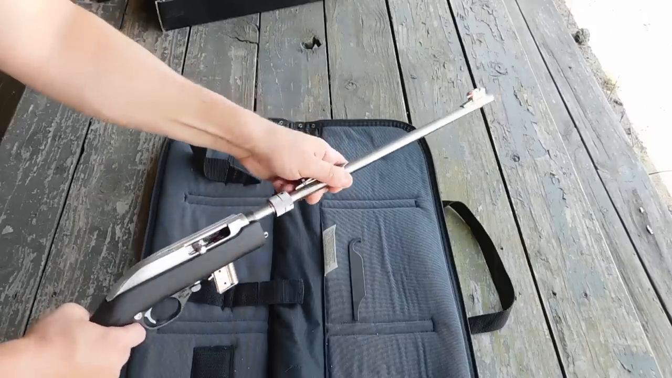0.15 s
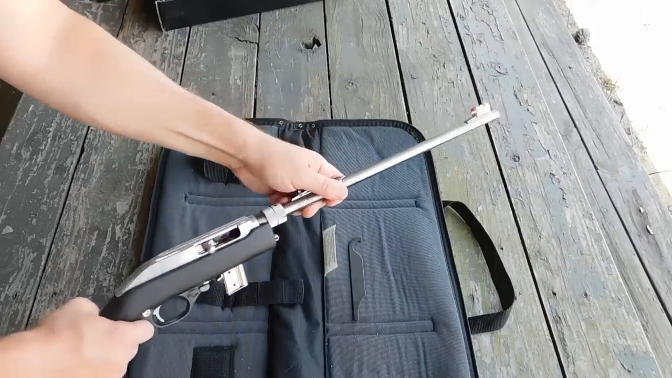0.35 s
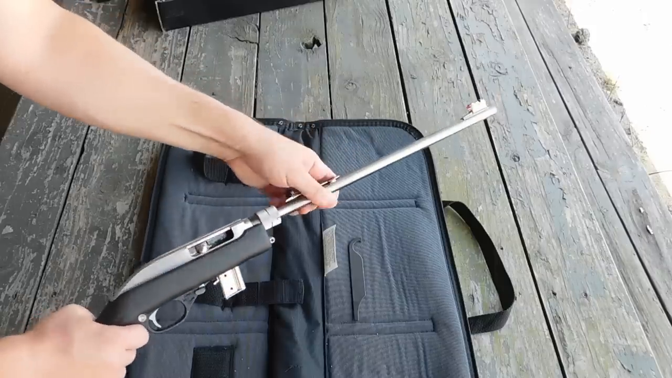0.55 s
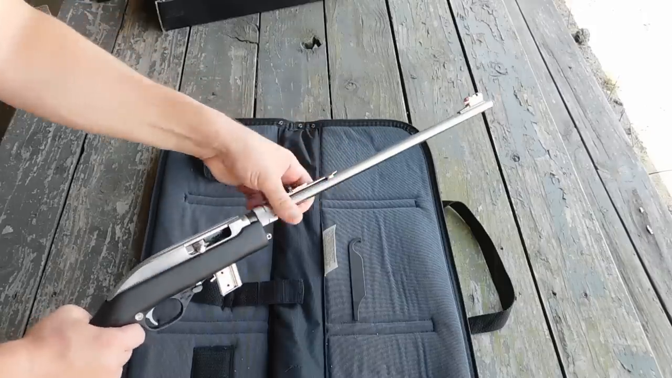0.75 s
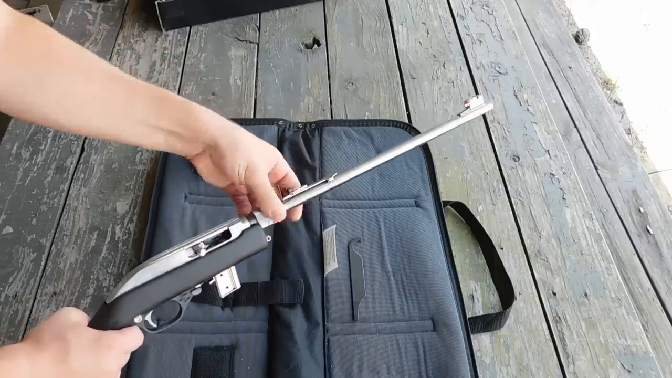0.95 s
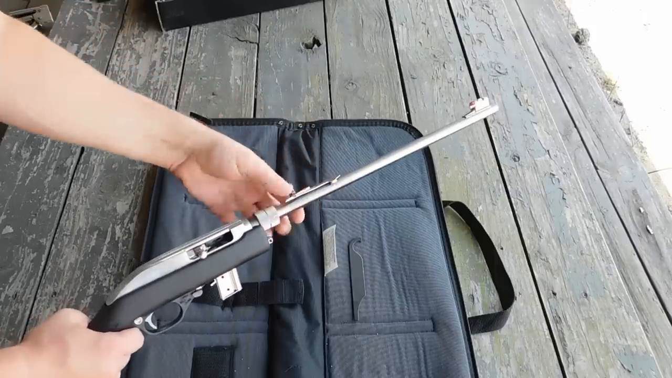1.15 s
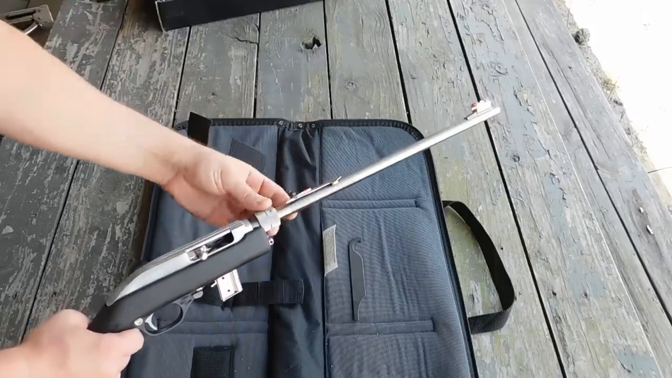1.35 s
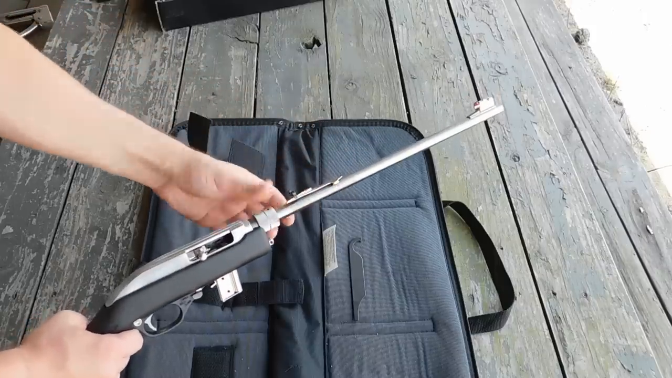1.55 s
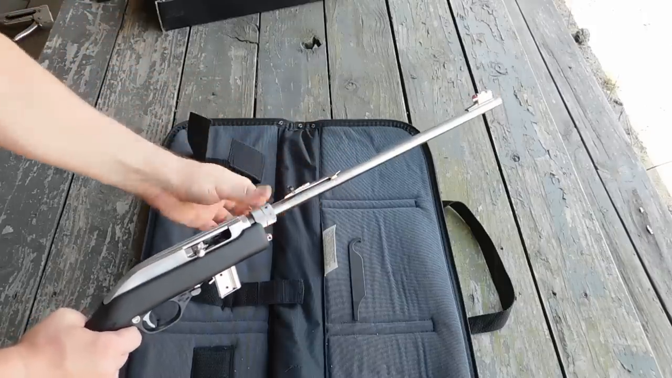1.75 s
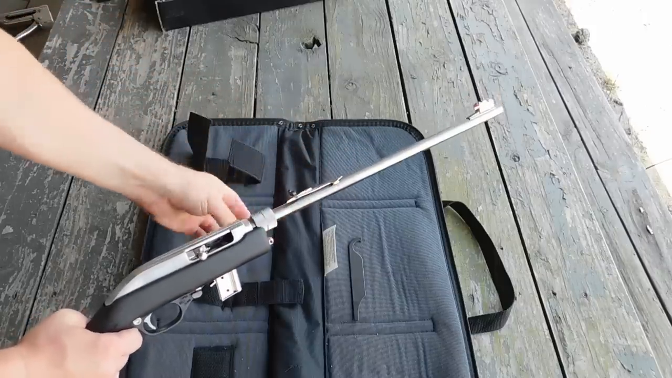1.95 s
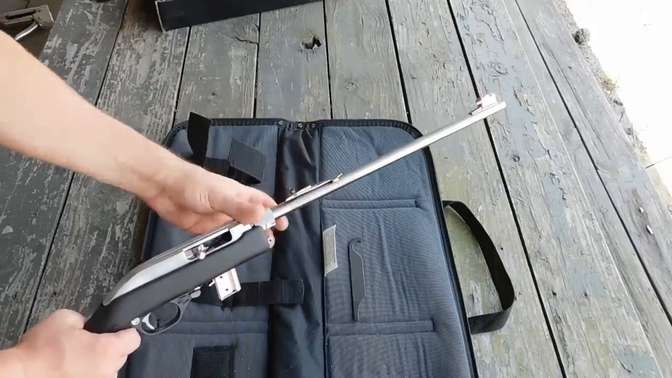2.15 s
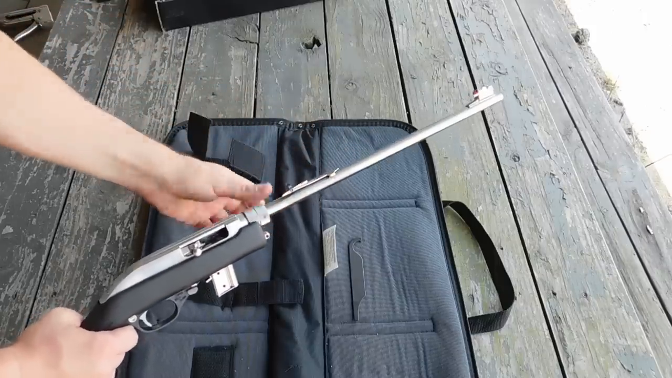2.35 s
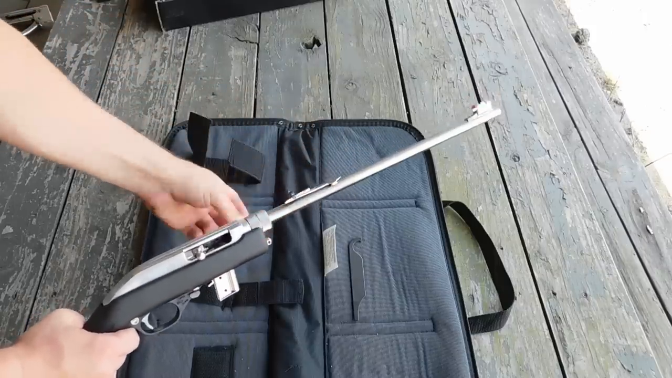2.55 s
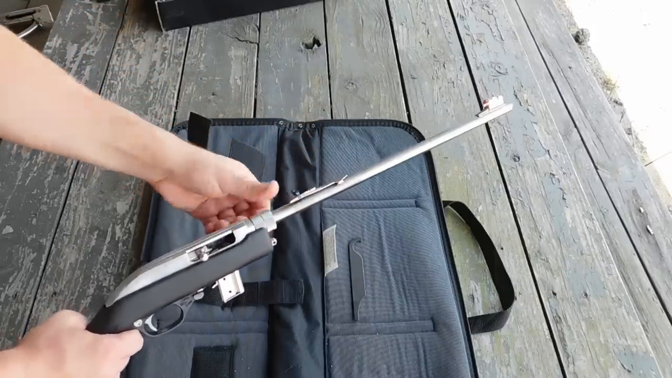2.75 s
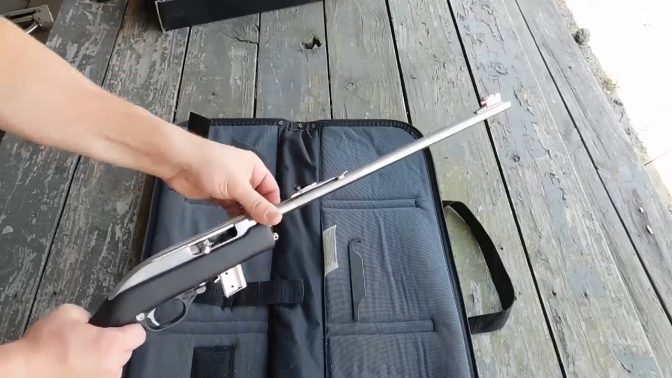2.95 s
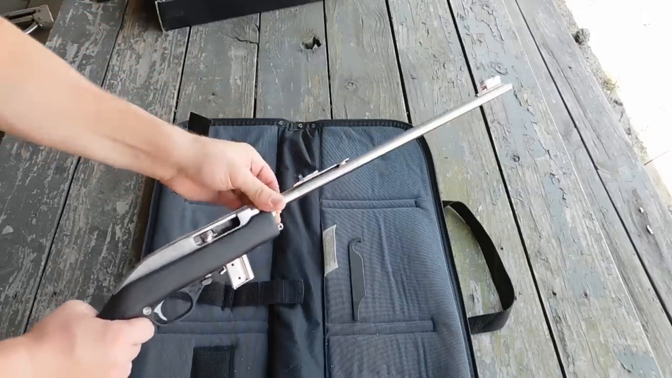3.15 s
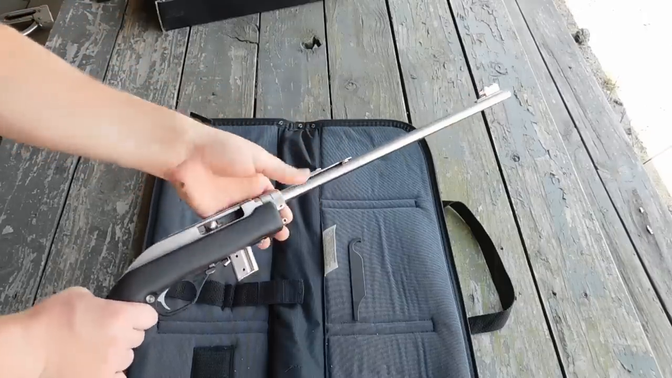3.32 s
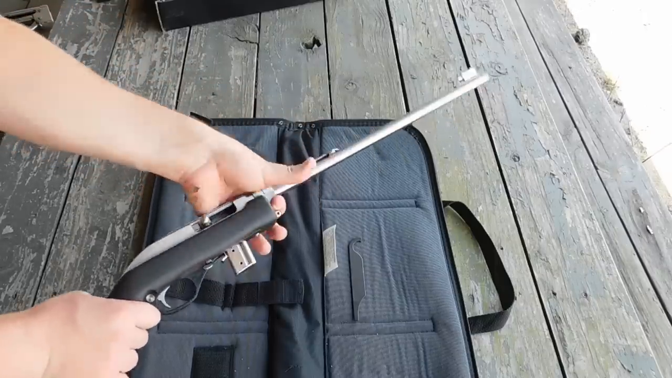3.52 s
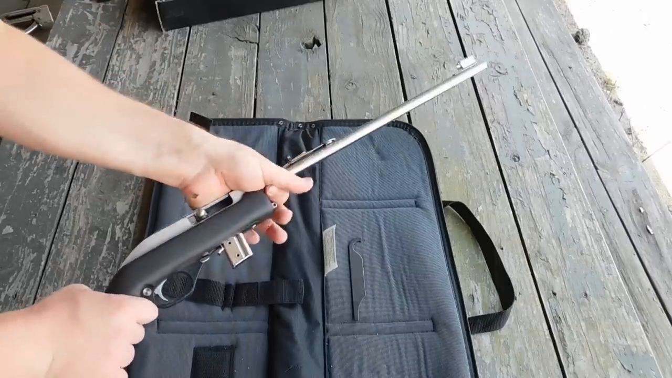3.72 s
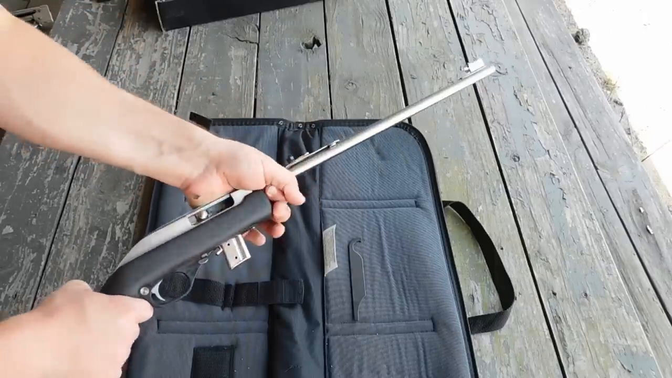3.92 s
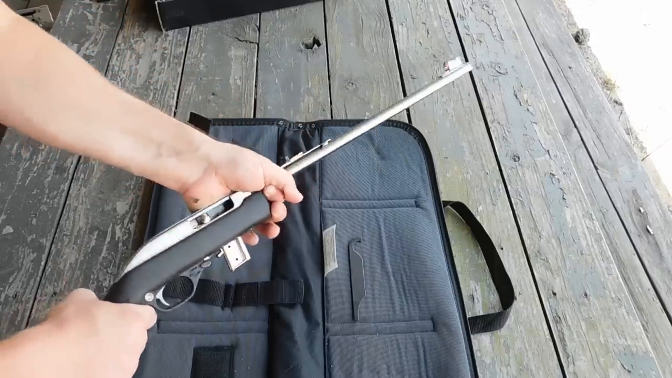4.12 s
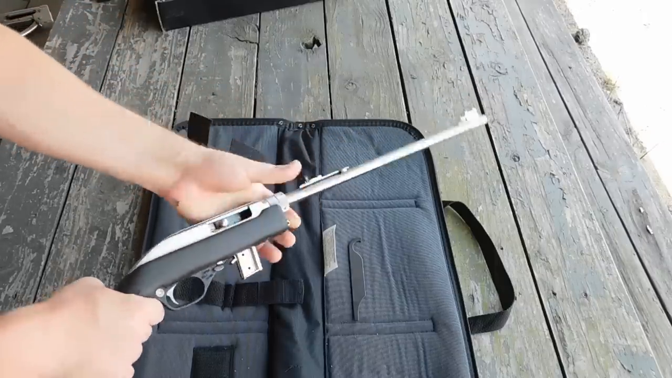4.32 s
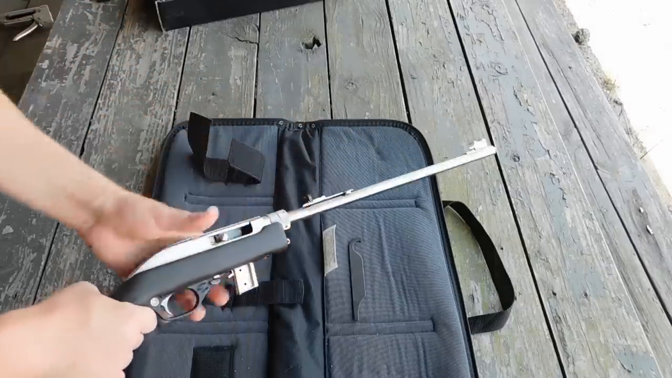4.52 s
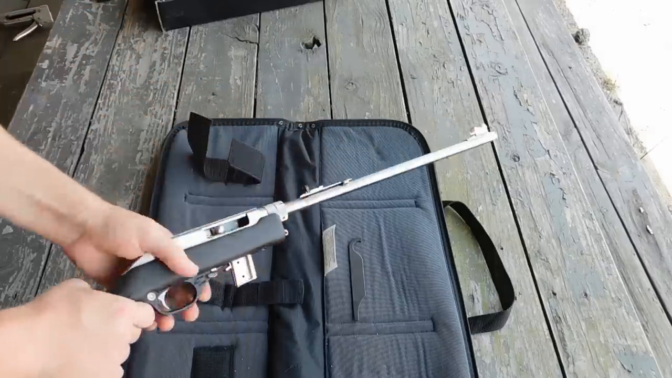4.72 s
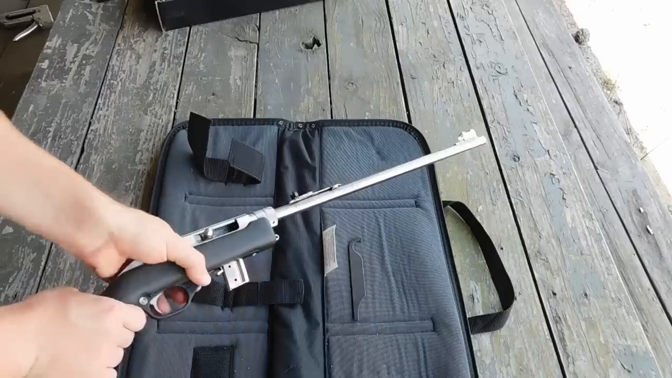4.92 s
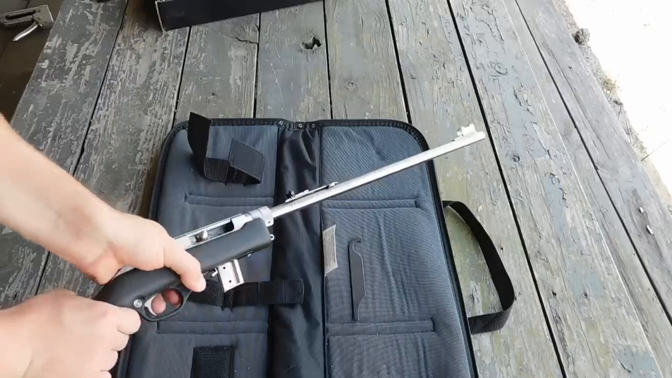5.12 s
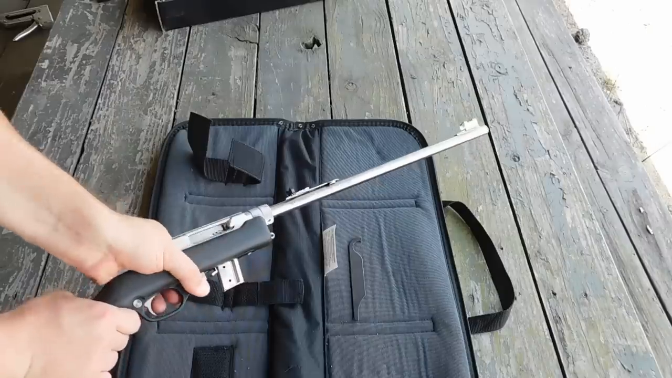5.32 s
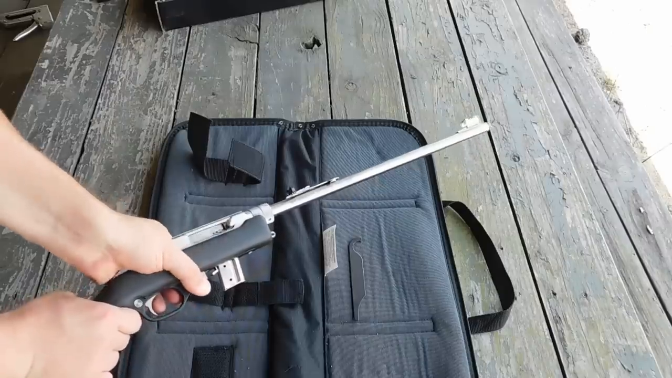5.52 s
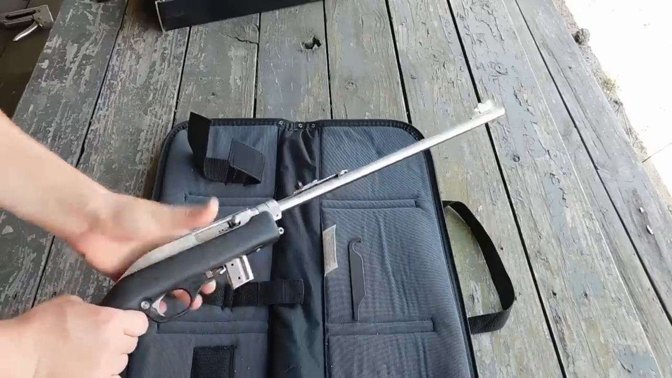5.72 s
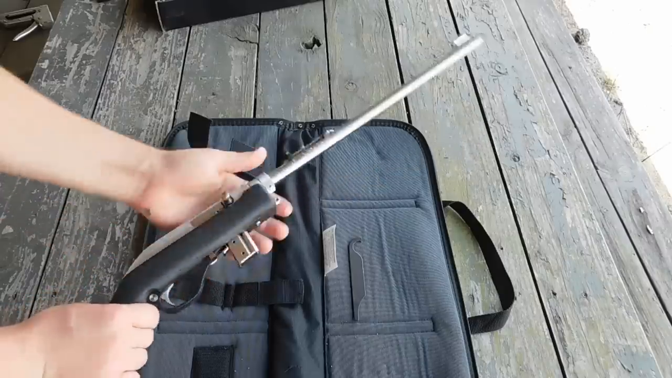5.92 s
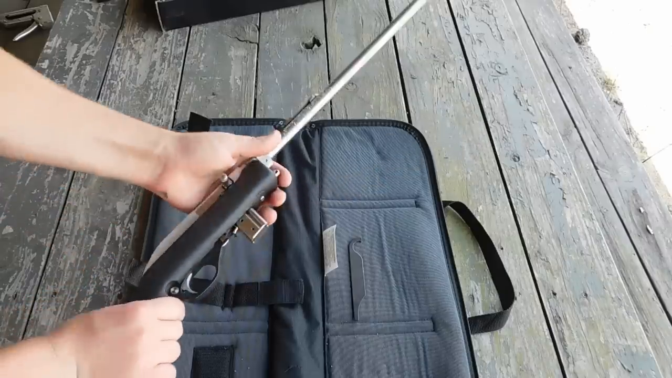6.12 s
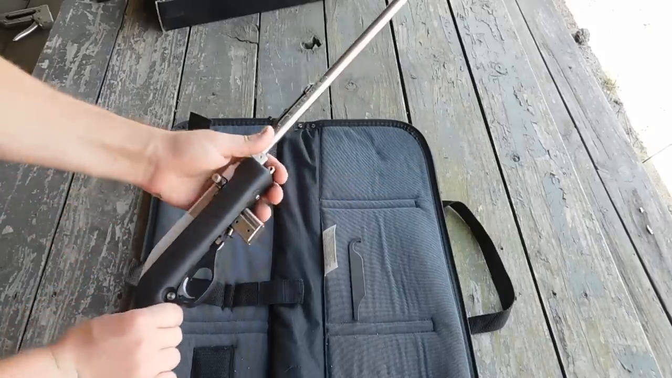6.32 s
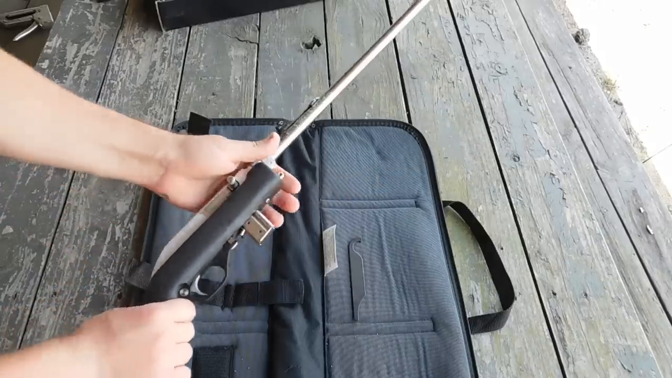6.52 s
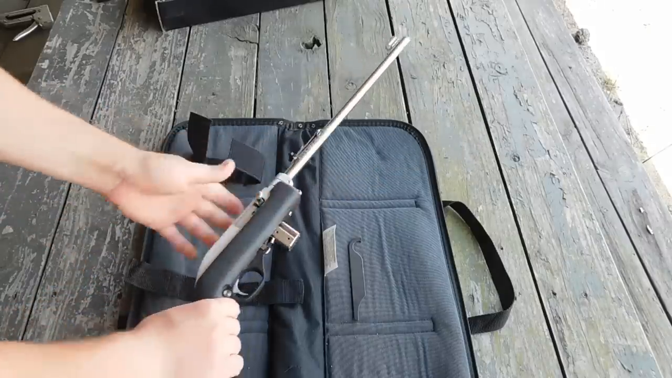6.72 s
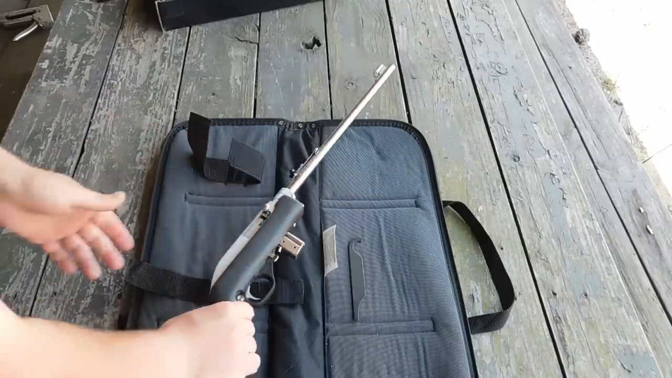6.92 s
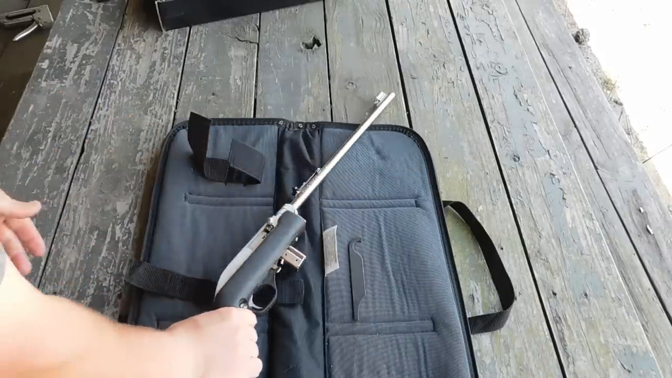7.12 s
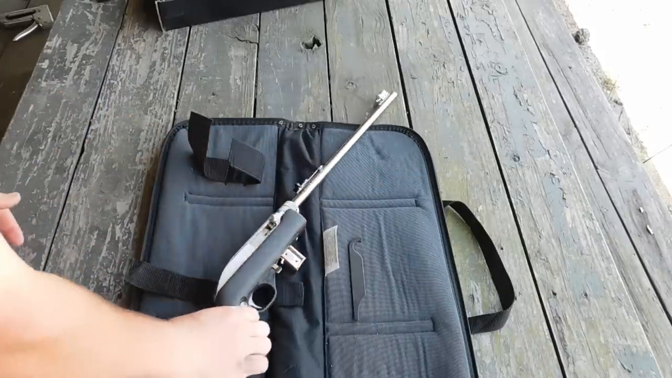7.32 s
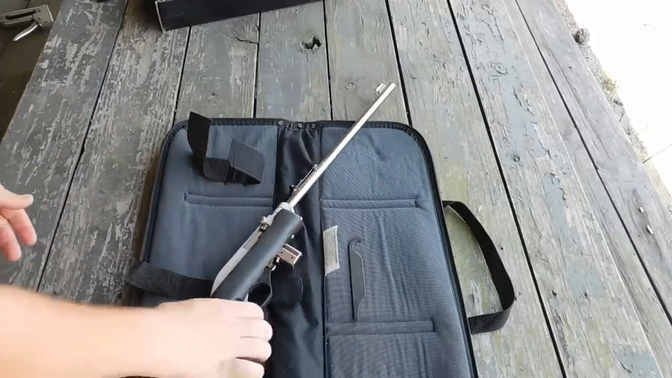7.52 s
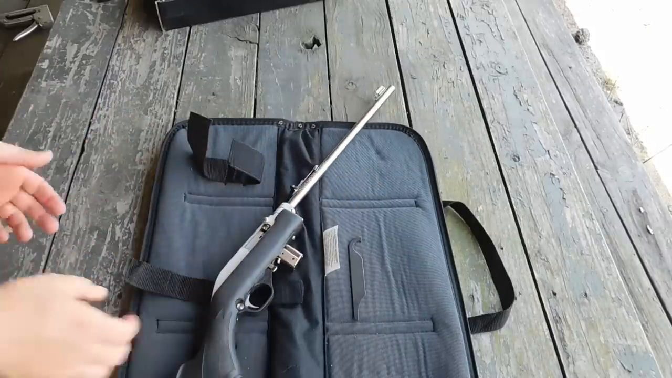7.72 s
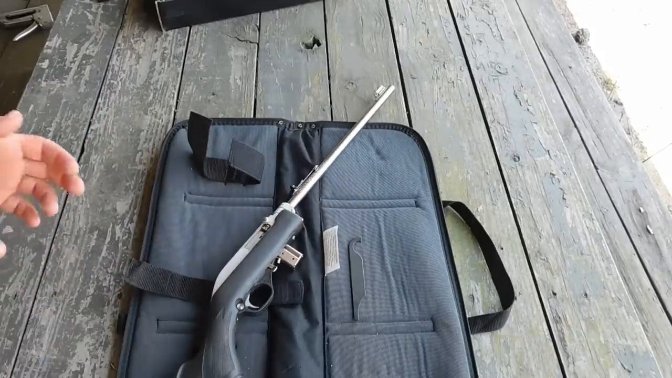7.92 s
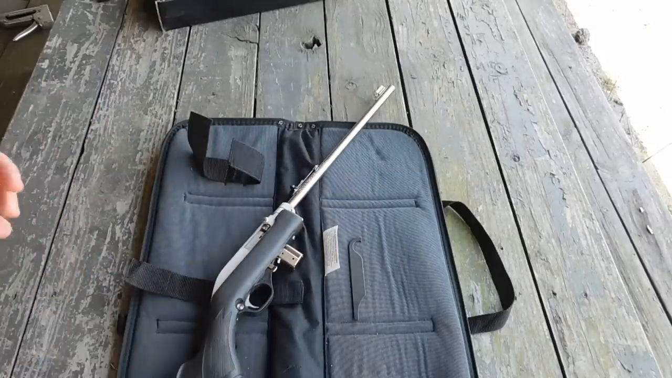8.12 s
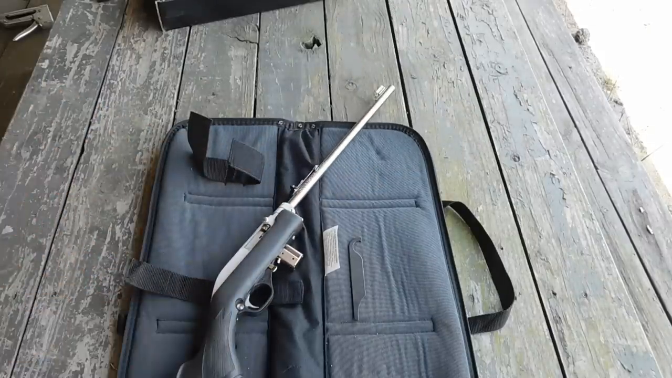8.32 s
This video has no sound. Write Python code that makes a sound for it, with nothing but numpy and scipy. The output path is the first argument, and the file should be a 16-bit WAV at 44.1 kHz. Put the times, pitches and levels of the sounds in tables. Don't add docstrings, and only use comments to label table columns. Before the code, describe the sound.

Steel barrel clacks hard into place, light ticks and nut turns follow, distant shots thud, a bolt slams, then the rifle settles on a padded case.

```python
import sys
import numpy as np
from scipy import signal
from scipy.fft import rfft, irfft
from scipy.io import wavfile

SR = 44100
rng = np.random.default_rng(int(sys.argv[2]) if len(sys.argv) > 2 else 0)


def digitize_waveform(pressure):
    field = np.atleast_2d(pressure).T
    bounded = np.clip(field, -1, 1)
    quanta = np.round(bounded * 32767).astype(np.int16)
    wavfile.write(sys.argv[1], SR, quanta)


def invert_db(x):
    u = np.asarray(x, float) / 20
    return 10 ** u


N = 368676

# [f/Hz, level/dB, t60/s]
BARREL_MODES = [(720, -0.5, 0.021), (1080, -12.5, 0.0065), (1332, -6, 0.0068), (1700, 1, 0.014),
                (2080, -1.5, 0.06), (2290, 7.5, 0.0091), (2890, -1.5, 0.022), (3650, -7, 0.012),
                (4040, -3, 0.018), (4760, -11.5, 0.011), (5430, -8.5, 0.012), (3900, -7, 0.016),
                (7500, -12.5, 0.0085), (7800, -7.5, 0.027), (9600, 3, 0.0026), (10800, -11, 0.0056),
                (12500, -7, 0.0017), (14600, -4.5, 0.0083)]
# [t/s, left-right level/dB]
HAND_PLACES = [
    (0, 1),
    (1.2, 4.5),
    (2.6, 3.5),
    (3.3, 5.5),
    (5.2, 2.5),
    (5.37, 5.5),
    (6, 1.5),
    (7.3, 4.5),
    (8.36, 11),
]


def rms_one(x):
    return x / np.sqrt(np.mean(x ** 2) + 1e-20)


def in_time(rows, off=None):
    s, *columns = np.transpose(rows)
    return [np.interp(np.arange(N) / SR, s, c, off, off) for c in columns]


def at_hz(points, hz):
    points_hz, values = np.transpose(points)
    return np.interp(np.log(hz), np.log(points_hz), values)


def drift(rate):
    hop = 40
    r = np.exp(-2 * np.pi * rate * hop / SR)
    white = rng.standard_normal(N // hop + 2002)
    slow = signal.lfilter([1], [1, -2 * r, r * r], white)[2000:]
    return np.interp(np.arange(N) / hop, np.arange(len(slow)), rms_one(slow))


def coloured(x, spectrum, alike=None):
    # [f/Hz, left-right likeness]
    field_likeness = [(60, 1), (240, 0.11), (950, -0.019), (3770, 0.061), (15000, -1.3)]
    hz = np.maximum(np.fft.rfftfreq(x.shape[-1], 1 / SR), 1)
    mid, side = rfft(x) * invert_db(at_hz(spectrum, hz))
    alike = np.clip(at_hz(field_likeness, hz) if alike is None else alike, 0, 1)
    both = np.sqrt(1 + alike) * mid + np.sqrt(1 - alike) * side * [[1], [-1]]
    return rms_one(irfft(both, x.shape[-1]))


def add(out, sound, s, pan_db):
    i = round(s * SR)
    placed = invert_db([[pan_db / 2], [-pan_db / 2]]) * sound
    out[:, i:i + sound.shape[-1]] += placed[:, :N - i]


def swells(rows):
    swell_db = 20
    power, t = np.zeros(N), np.arange(N) / SR
    for s, peak_db, rise, fall in rows:
        rise, fall = 4 * max(rise, 1e-3), 4 * max(fall, 1e-3)
        i, j = max(int((s - rise) * SR), 0), int((s + fall) * SR)
        below = np.interp(t[i:j], [s - rise, s, s + fall], [1, 0, 1])
        power[i:j] += invert_db(2 * (peak_db - 4 * swell_db * below))
    return np.sqrt(power)


def grains(per_s, size_db):
    sizes = invert_db(size_db * np.minimum(rng.exponential(1, (2, N)), 5)) * rng.choice([-1, 1], (2, N))
    return sizes * (rng.random((2, N)) < per_s / SR)


def mode_bank(modes):
    hz, level_db, t60 = np.transpose(modes)[:, :, None]
    t = np.arange(24000 if t60.max() > .1 else 2500) / SR
    return invert_db(level_db - 60 * t / t60) * np.sin(2 * np.pi * hz * t)


def even(noise, fade):
    x = noise * fade
    for _ in range(12):
        tones = rfft(x)
        x = irfft(tones / (np.abs(tones) + 1e-12), x.shape[-1])
        top = 2 * fade * np.sqrt(np.sum(x ** 2, -1, keepdims=True) / np.sum(fade ** 2))
        x = np.clip(x, -top, top)
    return x


def struck(hits, modes, scatter_db, spread, dense_db, low_hz, top_hz=11000):
    mid_hz, high_hz = 2800, 6500
    out, bank, hz = np.zeros((2, N)), mode_bank(modes), np.array(modes)[:, 0]
    t = np.arange(bank.shape[1]) / SR
    group = (hz > mid_hz).astype(int) + (hz > high_hz)
    borders = [low_hz, mid_hz, high_hz, top_hz]
    bands = [signal.butter(2, borders[g:g + 2], "band", fs=SR, output="sos") for g in range(3)]
    dense = [rms_one(signal.sosfilt(band, np.arange(len(t)) == 0)) for band in bands]
    roofs = [signal.butter(2, 1.4 * border, fs=SR, output="sos") for border in borders[1:]]
    strengths = invert_db(scatter_db * rng.standard_normal((len(hits), len(modes))))
    rattles = rng.standard_normal((len(hits), 2, 1500))
    for hit, strength, pair in zip(hits, strengths, rattles):
        s, peak_db, mid_db, high_db, body_hz, contact_ms = hit
        contact = max(contact_ms, .1) * SR / 1000
        k = np.arange(pair.shape[1])
        fade = np.exp(-k / contact)
        fade = fade * (1 - np.exp(-k / (0.031 * contact)))
        mid, side = even(pair, fade)
        body = rms_one(invert_db(-60 * t / .014) * np.sin(2 * np.pi * body_hz * t))
        pan_db = np.interp(s, *np.transpose(HAND_PLACES))
        for g in np.unique(group):
            tone = rms_one(strength * (group == g) @ bank)
            tone = tone + invert_db(dense_db + .12 * peak_db) * dense[g]
            tone = signal.sosfilt(roofs[g], tone + invert_db(-0.5) * body * (g == 0))
            rattle = mid + spread * (1 + g) * side * [[1], [-1]]
            sound = signal.fftconvolve(rattle, tone[None], axes=1)
            level_db = peak_db + [0, mid_db, high_db][g]
            sound = sound / np.abs(sound.mean(0)).max() * invert_db(level_db)
            add(out, sound, s + .0005, pan_db - 0.4 * g)
    return out


def barrel():
    # [t/s, level/dB, brightness/dB, body f/Hz, contact/ms]
    knocks = [(0.123, -34.5, -13, 1720, 11), (0.26, -41, 8.5, 2080, 11), (0.2872, 5, -5, 1800, 1.15),
              (0.2945, -15, -0.5, 2070, 1.9), (0.313, -22, 7, 2170, 2.2), (0.659, -35.5, 0, 1080, 3.3),
              (1.053, -38, 2.5, 1470, 8.6), (1.0652, -33, -23, 2340, 2.9), (1.0857, -29, -3.5, 1590, 1.44),
              (1.146, -29, 0.5, 2280, 4.6), (1.3126, -23, 2.5, 2290, 3), (1.3208, -28, 2, 2270, 1.7),
              (1.3268, -27, 1.5, 2290, 2.5), (1.3769, -36.5, -25, 2100, 4.3),
              (1.4085, -44, -21.5, 1390, 5.4), (1.955, -33.5, -32, 1224, 7.8), (2.2736, -42, -1, 1530, 4),
              (2.5945, -24.5, -1, 1580, 1.1), (2.5984, -21.5, -8.5, 1350, 1.6),
              (3.2528, -47, -7.5, 1560, 5.6), (3.5673, -45, -7, 1516, 3.5), (5.2372, -47.5, 0, 1357, 4.7),
              (5.6583, -40.5, 0.5, 2600, 6), (6.014, -40, -3.5, 2483, 6.3)]
    # [t/s, level/dB, brightness/dB, body f/Hz]
    ticks = [(0.233, -42, -4.5, 2020), (0.6847, -37.5, -7, 1030), (0.8015, -45.5, -14.5, 1000),
             (0.8879, -46, -7.5, 1660), (0.9574, -40, -27, 2470), (0.99, -47, -10, 1430),
             (1.1332, -35, -19.5, 1520), (1.707, -51, -8, 1326), (1.7522, -44.5, -14.5, 1445),
             (1.9998, -48, -1, 1630), (2.3446, -48, -16.5, 1160), (2.5117, -46, -20, 1200),
             (2.54, -44, -30.5, 1495), (2.5553, -46, -17, 1610), (3.421, -49, -12, 2234),
             (3.625, -43, -20, 2270), (4.2672, -56.5, 3, 2010), (4.5898, -53, 1, 1690),
             (4.8023, -48, -16.5, 1190), (7.1233, -40, -7.5, 2450), (7.1506, -46, -12.5, 1944),
             (7.3038, -46, -11, 1300), (7.3472, -49, -2, 1500), (7.43, -42.5, -13, 1500),
             (7.45, -48, -10, 2200), (7.5892, -56, -8, 1880), (7.6102, -55.5, 6.5, 1685),
             (7.696, -57.5, 10, 1753)]
    follows = 0.72
    hits = []
    for s, db, bright, hz, ms in knocks:
        hardness_db = 0.2 * min(db, -20)
        hits.append((s, db, bright, -2.5 + follows * bright + hardness_db, hz, ms))
    for s, db, bright, hz in ticks:
        hits.append((s, db, bright, -8.5 + follows * bright, hz, 2.5))
    return struck(hits, BARREL_MODES, scatter_db=3.5, spread=0.18, dense_db=5.5, low_hz=1000)


def bolt():
    # [t/s, level/dB, mid level/dB, high level/dB, contact/ms]
    slams = [
        (5.369, -0.5, 9.5, 3.5, 1.53),
        (5.376, -11, 0, -4, 4),
        (5.384, -11, -1, -4, 2.5),
    ]
    # [f/Hz, level/dB, t60/s]
    bolt_modes = [(170, -30.5, 0.022), (950, -8, 0.011), (1500, 1, 0.016), (2010, 1, 0.014),
                  (2820, -5, 0.012), (3870, -1, 0.014), (3960, 0, 0.0089), (4600, -6, 0.016),
                  (4923, -12.5, 0.014), (5100, -8.5, 0.0065), (6560, 12, 0.0084), (7000, -1.5, 0.0044),
                  (7307, 2.5, 0.01), (8840, -3, 0.009), (10200, -13.5, .004), (11920, -16.5, 0.0022),
                  (13500, -14, 0.0034), (16000, -15.5, 0.0063)]
    body_hz = 2400
    hits = [(s, db, mid, high, body_hz, ms) for s, db, mid, high, ms in slams]
    return struck(hits, bolt_modes, scatter_db=9.5, spread=0.49, dense_db=9.5, low_hz=900, top_hz=14650)


def pings():
    # [t/s, level/dB, f/Hz, t60/s]
    free_modes = [(0.2595, -32, 3650, 0.045), (0.272, -39, 5430, .05), (0.2945, -29, 3650, 0.013),
                  (0.2958, -19, 10800, 0.012), (0.2955, -19.5, 8900, .01), (0.33, -24, 5600, .01),
                  (0.311, -17.5, 3600, 0.027), (0.324, -28, 3650, .02), (0.659, -37, 3660, 0.035),
                  (1.057, -52, 4700, .04), (1.087, -38, 3650, .05), (1.146, -30, 3720, 0.035),
                  (1.147, -38, 4900, .04), (1.313, -39, 5400, 0.026), (1.313, -28, 3750, 0.036),
                  (1.327, -31, 3450, 0.035), (1.378, -40.5, 3600, 0.046), (1.409, -45, 1410, .1),
                  (2.5946, -20.5, 1540, 0.026), (2.596, -20, 1380, 0.024), (2.605, -39, 1474, 0.11),
                  (5.3701, -1, 3870, 0.025), (5.372, -10, 3780, .03), (5.37, -12, 857, 0.024),
                  (5.385, -42, 838, .4), (5.385, -41, 860, .4), (5.39, -41, 1040, .3),
                  (5.37, -16, 1500, .03), (5.37, -26, 80, .04), (5.376, -15.5, 7260, .03),
                  (5.383, -11, 3990, 0.025), (5.384, -25, 4330, .05), (5.659, -40.5, 2540, 0.036),
                  (5.371, -24, 195, .05), (5.37, -18, 555, .03), (5.381, -27, 530, .03),
                  (5.659, -46.5, 4530, .02), (5.659, -51, 5700, .02), (3.63, -55, 2260, .04),
                  (3.659, -51, 2270, .015), (3.59, -54, 2300, .03), (3.8555, -50, 1710, .012),
                  (3.256, -52, 600, .12), (3.42, -55, 2150, .05), (7.35, -42.5, 138, .3),
                  (7.385, -45, 68, .35), (7.34, -48, 240, .15), (2.5125, -42, 1250, .02),
                  (7.1235, -45, 2500, .012), (1.147, -40, 2270, .06), (1.314, -36, 2280, .05),
                  (0.288, -12, 2080, .02), (2.595, -30, 2660, .02), (2.595, -28.5, 3650, .02)]
    rise_s = 0.0002
    out, t = np.zeros((2, N)), np.arange(14000) / SR
    for s, peak_db, pitch_hz, t60 in free_modes:
        envelope = invert_db(peak_db - 60 * t / t60) * (1 - np.exp(-t / rise_s))
        tone = envelope * np.sin(2 * np.pi * pitch_hz * t)
        add(out, tone, s, np.interp(s, *np.transpose(HAND_PLACES)))
    return out


def rubbing():
    # [t/s, level/dB, rise/s, fall/s]
    strokes = [(0.12, -41, 0.0088, 0.0022), (0.175, -53.5, .02, .02), (0.238, -47.5, .025, .03),
               (0.27, -44, 0.04, 0.013), (0.285, -24, 0.0097, 0.0015), (1.05, -54, 0.2, .01),
               (1.096, -41, 0.061, .012), (1.311, -40.5, 0.0079, .002), (1.35, -48, .002, .012),
               (1.46, -46, 0.17, 0.069), (1.714, -48.5, 0.053, 0.017), (1.748, -53.5, .04, 0.075),
               (1.985, -51, 0.0055, 0.15), (2.28, -49, 0.088, 0.02), (2.35, -56, 0.082, 0.09),
               (2.572, -53, 0.095, .02), (2.586, -32, 0.015, 0.012), (3.265, -55.5, .005, 0.061),
               (3.577, -53, 0.0039, 0.072), (4.008, -60, 0.082, 0.16), (4.604, -62, .07, .3),
               (4.8, -56.5, 0.084, 0.63), (5.352, -29, 0.0061, .06), (5.367, -22.5, 0.015, .002),
               (5.66, -47, .02, .02), (6.016, -50, .014, 0.021), (3.665, -59, 0.018, 0.032)]
    # [f/Hz, level/dB per Hz]
    rasp_colour = [(250, -29.5), (500, -10.5), (1200, 0.5), (2100, 1), (3600, -1), (5500, -14.5),
                   (9000, -19), (15000, -23.5)]
    slips = grains(6000, 1.4)
    dull = [(hz, db - 7.0 * np.log2(hz / 1500) * (hz > 1500), t60) for hz, db, t60 in BARREL_MODES]
    ringing = rms_one(signal.fftconvolve(slips[0], mode_bank(dull).sum(0))[:N])
    rasp = coloured(slips, rasp_colour, 0.99)
    pressure = signal.lfilter([.006], [1, -.994], swells(strokes))
    pan_db = in_time(HAND_PLACES)[0]
    return invert_db(-3.0 + pan_db * [[.5], [-.5]]) * pressure * (rasp + .35 * ringing)


def nut():
    # [t/s, level/dB]
    rings = [(0.2867, -38), (0.3038, -27.5), (0.325, -40), (0.6594, -55), (1.1458, -75), (1.3139, -56),
             (1.3274, -60), (1.4663, -68), (1.747, -71), (1.956, -64.5), (2.3022, -67), (2.3794, -75.5),
             (2.5954, -63)]
    tone = mode_bank([(15270, 0, .08), (15420, -5, .05), (15200, -6, .07)]).sum(0)
    tone = tone * (1 - np.exp(-np.arange(len(tone)) / 40))
    out = np.zeros((2, N))
    for s, peak_db in rings:
        add(out, invert_db(peak_db + 6.0) * tone, s, .1)
    return out


def recoil():
    # [t/s, level/dB]
    blows = [
        (0.287, -22.5),
    ]
    modes = [(184, -11.0, 0.018), (443, -5.0, 0.013), (620, -2.0, .05), (743, 1.0, 0.077)]
    knock = mode_bank(modes).sum(0)
    knock = signal.sosfilt(signal.butter(2, 140, "high", fs=SR, output="sos"), knock)
    out = np.zeros((2, N))
    for s, peak_db in blows:
        add(out, invert_db(peak_db - 3.5) * knock, s, 3.5)
    return out


def creak():
    # [t/s, f/Hz, level/dB]
    glide = [
        (4.62, 1146, -82),
        (4.645, 1154, -56.5),
        (4.67, 1170, -75),
        (4.77, 1170, -80.5),
        (4.79, 1176, -58),
        (4.83, 1230, -59),
        (4.86, 1240, -75),
    ]
    level_db, pitch_hz = in_time(glide, off=-200)[1], in_time(glide)[0]
    phase = 2 * np.pi * np.cumsum(pitch_hz * (1 + 0.011 * drift(58.0))) / SR
    return invert_db(level_db + 4.5 * drift(50)) * (np.sin(phase) + 0.57 * np.sin(2 * phase))


def stock():
    # [t/s, level/dB, contact/ms]
    landings = [
        (7.309, -31, 4),
        (7.322, -34, 6.2),
    ]
    # [f/Hz, level/dB, t60/s]
    stock_modes = [(62, -3, 0.45), (97.1, 5, 0.72), (127, 5, 0.45), (190, 4, 0.35), (323, 6, 0.26),
                   (370, 0, 0.25), (520, -3, 0.1)]
    high_db, body_hz = -20, 326
    hits = [(s, db, high_db, high_db, body_hz, ms) for s, db, ms in landings]
    return struck(hits, stock_modes, scatter_db=1.5, spread=.3, dense_db=-25, low_hz=100)


def cloth():
    # [t/s, level/dB, rise/s, fall/s]
    swishes = [
        (7.134, -56, 0.024, 0.29),
        (7.28, -57, 0.15, 0.55),
        (7.44, -52.5, 0.12, 0.11),
        (7.505, -53, 0.11, 0.096),
        (7.6, -57.5, 0.093, 0.3),
        (8.33, -60, 0.32, 0.18),
    ]
    # [f/Hz, level/dB per Hz]
    fibre_colour = [(290, -14), (500, -18.5), (694, -12.5), (1170, -7.5), (1410, -8.5), (2800, -12),
                    (6760, -24), (15000, -27.5)]
    return swells(swishes) * invert_db(1.3 * drift(23.7)) * coloured(grains(2500, 1.34), fibre_colour, 0.46)


def porch(x):
    # [f/Hz, t60/s]
    decay = [(200, 0.19), (530, 0.38), (900, 0.44), (1390, 0.4), (3680, .35), (7000, 0.34), (10000, 0.31),
             (15000, 0.22)]
    # [f/Hz, level/dB]
    tail_colour = [(150, -11.5), (500, -3.5), (1500, -5), (4000, -8.5), (7000, -3.5), (9000, -2.5),
                   (15000, -5.5)]
    t, response = np.arange(20000) / SR, 0
    thirds = 125 * 2 ** np.arange(0, 7.1, 1 / 3)
    white = rng.standard_normal((2, 2, len(t)))
    for k, (low, high) in enumerate(zip(thirds, thirds[1:])):
        hz = np.sqrt(low * high)
        noise = np.roll(white[k % 2], 999 * k, axis=1)
        band = signal.sosfilt(signal.butter(1, [low, high], "band", fs=SR, output="sos"), noise)
        response = response + band * invert_db(at_hz(tail_colour, hz) - 60 * t / at_hz(decay, hz))
    response = response * (1 - np.exp(-(t / 0.0066) ** 2))
    response = response + 0.3 * response[::-1]
    return signal.fftconvolve(x.mean(0)[None], response, axes=1)[:, :N]


def thuds():
    # [t/s, level/dB, left-right level/dB, pulse/ms, tail level/dB]
    shots = [
        (0.022, -29.5, 3, 2.7, -3.5),
        (0.654, -7, 4, 0.9, -7),
        (2.061, -20.5, 3.5, 1.8, -3.5),
        (2.686, -16, 4, 1.87, -3.5),
    ]
    # [f/Hz, level/dB per Hz]
    distance_colour = [(45, -35), (90, -6), (200, 1), (410, -4.5), (665, 5), (980, -6), (2000, -28),
                       (3000, -75)]
    # [lag/s, gain]
    echoes = [
        (.0062, -.3),
        (.0225, .45),
        (.047, .06),
        (.059, 0.13),
    ]
    # f/Hz, level/dB, t60/s
    ring_hz, ring_db, ring_t60 = (670, -34, .06)
    out, t = np.zeros((2, N)), np.arange(16384) / SR
    hz = np.maximum(np.fft.rfftfreq(len(t), 1 / SR), 1)
    cepstrum = irfft(np.log(invert_db(at_hz(distance_colour, hz))))
    cepstrum[1:len(t) // 2] *= 2
    colour = np.exp(rfft(cepstrum[:len(t) // 2], len(t)))
    ring = mode_bank([(ring_hz, 0, ring_t60)])[0]
    tails = rng.standard_normal((len(shots), 2, len(t)))
    for (s, peak_db, pan_db, pulse_ms, tail_db), noise in zip(shots, tails):
        pulse = np.sin(2000 * np.pi * t / pulse_ms) * (t < pulse_ms / 1000)
        pulse = pulse + sum(gain * np.roll(pulse, round(lag * SR)) for lag, gain in echoes)
        pulse = pulse + invert_db(ring_db) * signal.fftconvolve(pulse, ring)[:len(t)]
        envelope = invert_db(tail_db - 60 * t / 0.41) * (1 - np.exp(-t / 0.0039))
        tail = envelope * (noise + .5 * noise[::-1])
        sound = irfft(rfft(pulse + tail) * colour)
        add(out, invert_db(peak_db - 10.5) * sound / np.abs(sound.mean(0)).max(), s + 0.00041, pan_db)
    return out


def insects():
    # [t/s, level/dB, rise/s, fall/s]
    songs = [(0.09, -67.5, 0.25, 0.44), (0.63, -64.5, 0.34, 0.28), (1.243, -66, .012, .012),
             (1.26, -76, 0.12, 0.73), (1.607, -65, .012, .012), (1.66, -64.5, .012, .015),
             (1.93, -75, 1, 1.5), (3.55, -68.5, 0.83, 1.45), (3.96, -68.5, 0.77, 0.75),
             (4.9, -66.5, 0.87, 0.36), (5.54, -74.5, .23, 0.39), (5.628, -68, 0.011, .015),
             (5.71, -62, .015, 0.014), (6.14, -72, .015, .02), (6.68, -76, .4, .2), (6.797, -70, .01, .01),
             (7.4, -70, 0.82, 1.56), (8.36, -74, 0.99, .1)]
    # [f/Hz, level/dB per Hz]
    wing_colour = [(4710, -45.5), (8000, -20), (8590, -10.5), (10400, -4.5), (11500, 0.5), (13500, -5),
                   (14200, -16), (15800, -27)]
    # [t/s, lead/rad]
    throb_lead = [(0, .7), (.8, -1.5), (3, .5), (3.15, .7), (3.3, 3.3), (3.7, 2.6), (4.15, 3.1),
                  (4.35, 3.7), (4.85, 3.7), (5.1, 2.8), (7, .7), (7.2, .4), (8, 1.3)]
    throbs_per_s, depth = 29.3, 0.78
    phase = 2 * np.pi * throbs_per_s * np.arange(N) / SR + in_time(throb_lead)[0] + .1 * drift(.4)
    stroke = (.5 + .5 * np.cos(phase)) ** 1.2
    throb = 1 - depth + 2 * depth * stroke
    return invert_db(3.5 + 1.5 * drift(4)) * swells(songs) * throb * coloured(grains(12000, 1.5), wing_colour, .1)


def wind():
    # [t/s, level/dB, rise/s, fall/s]
    gusts = [(0.0, -69.5, .1, 0.9), (0.8, -66.5, .6, 0.95), (1.18, -66.5, 0.37, 0.37),
             (2.15, -62, 0.34, 1.2), (2.5, -66.5, 1, 1.2), (4.15, -70.5, 1.1, 1), (4.75, -64.5, 1.5, 0.48),
             (5.58, -67.5, .5, 0.29), (6.64, -71, .6, 0.44), (8.2, -62, .9, 0.34)]
    gust_colour = [(10, -10.0), (30, 1.5), (70, -5.5), (150, -16.0), (300, -41.5), (600, -90.5)]
    breeze_db = -73
    turbulence = coloured(rng.standard_normal((2, N)), gust_colour, 0.27)
    return np.hypot(invert_db(breeze_db), swells(gusts)) * invert_db(3.5 + 3.3 * drift(22)) * turbulence


def engine():
    # [t/s, level/dB, rise/s, fall/s]
    passes = [
        (0.07, -65.5, 0.045, 0.2),
        (0.9, -78, 0.46, 0.9),
        (1.72, -72, 0.14, 0.23),
        (2.18, -67, 0.52, 0.5),
        (2.75, -64.5, 0.3, 0.29),
    ]
    hum_hz = 151
    colour = [(hum_hz * 0.56, -60), (hum_hz, 0), (hum_hz * 1.6, -60)]
    return invert_db(7.5) * swells(passes) * coloured(rng.standard_normal((2, N)), colour, 0.66)


def air():
    # [f/Hz, level/dB per Hz]
    air_colour = [(59, -42), (100, -13), (156, -11.5), (502, -7), (648, -6), (736, -6), (1650, -8),
                  (2320, -11.5), (2630, -10.5), (3620, -20.5), (11400, -27), (16000, -22.5)]
    level_db = -60 + 1.1 * drift(0.97) + .5 * drift(18)
    return invert_db(level_db) * coloured(rng.standard_normal((2, N)), air_colour)


def scene():
    no_bass = signal.butter(3, 600, "high", fs=SR, output="sos")
    steel = signal.sosfilt(no_bass, barrel() + rubbing())
    near = steel + bolt() + nut() + stock() + recoil() + creak()
    clear = pings()
    reverberation = invert_db(-35.5) * porch(near + invert_db(-5) * clear)
    field = thuds() + insects() + wind() + engine() + air()
    return near + clear + reverberation + cloth() + field


def low_pass(x):
    return signal.sosfilt(signal.butter(12, 16490, fs=SR, output="sos"), x)


def record(dry):
    rounded = .84 * np.tanh(dry / .84)
    top_cut = signal.cheby2(12, 60, 15900 * 1.03, fs=SR, output="sos")
    return low_pass(signal.sosfilt(top_cut, rounded))


dry = scene()
out = record(dry)
digitize_waveform(out)
```